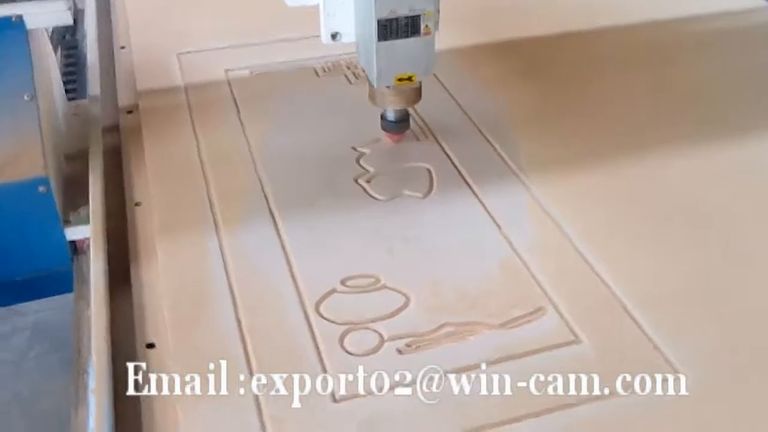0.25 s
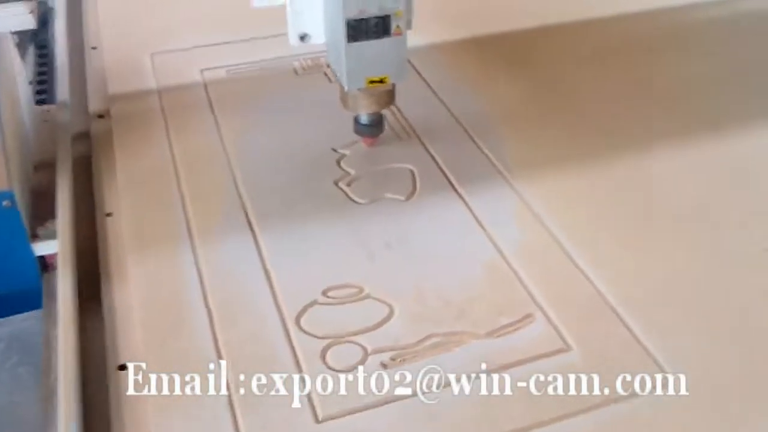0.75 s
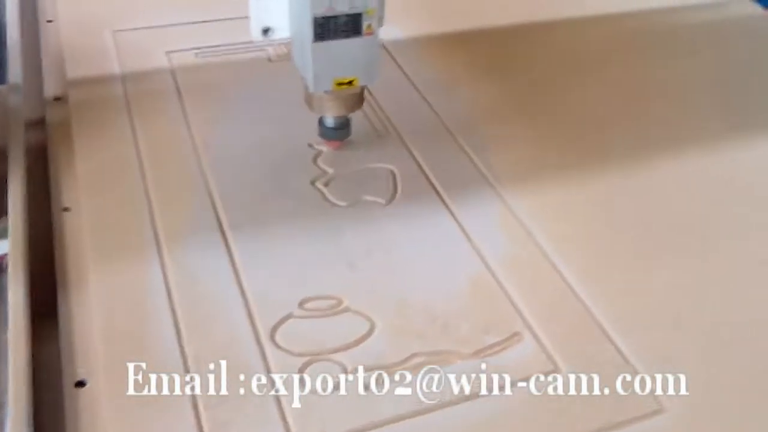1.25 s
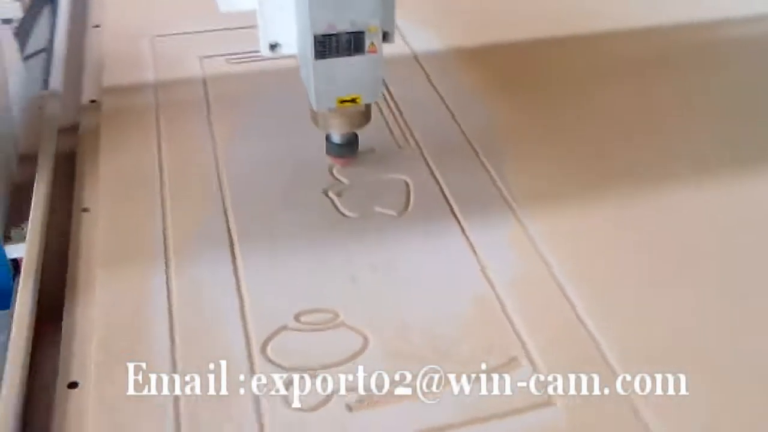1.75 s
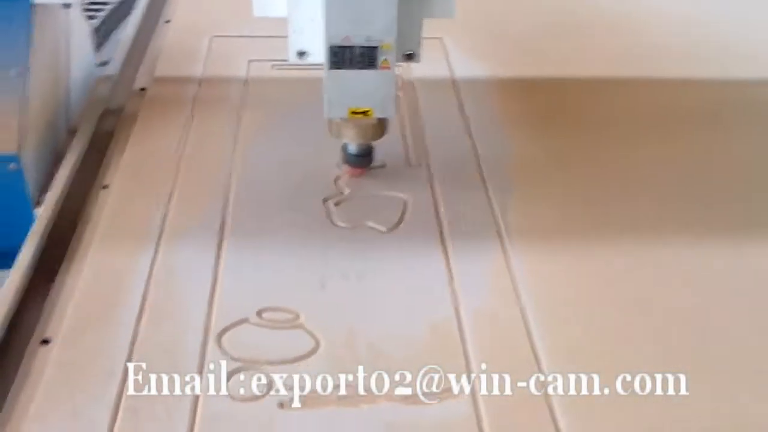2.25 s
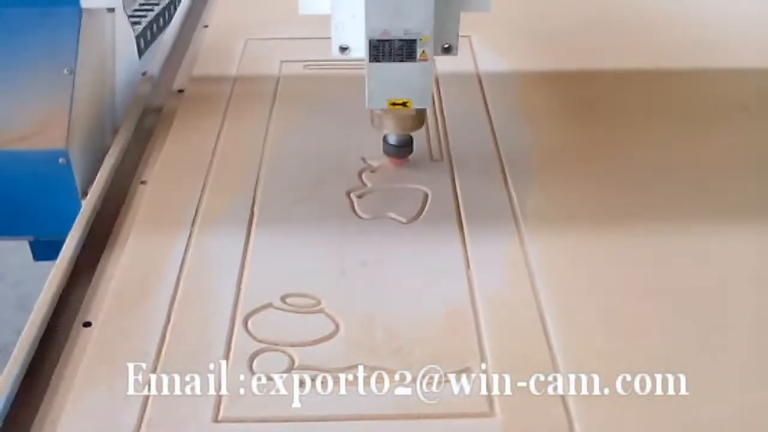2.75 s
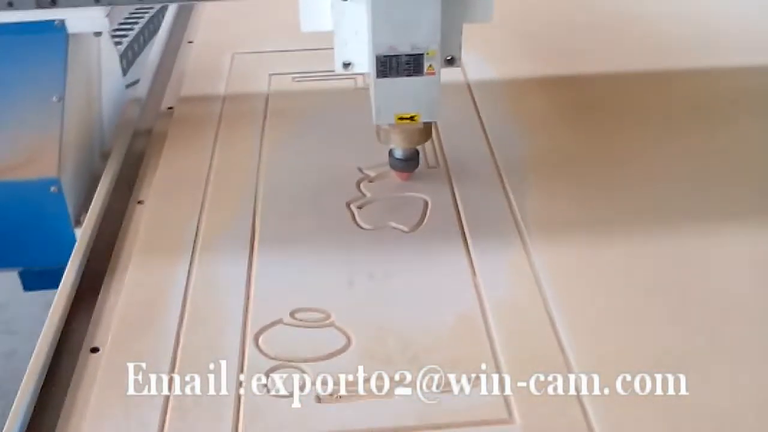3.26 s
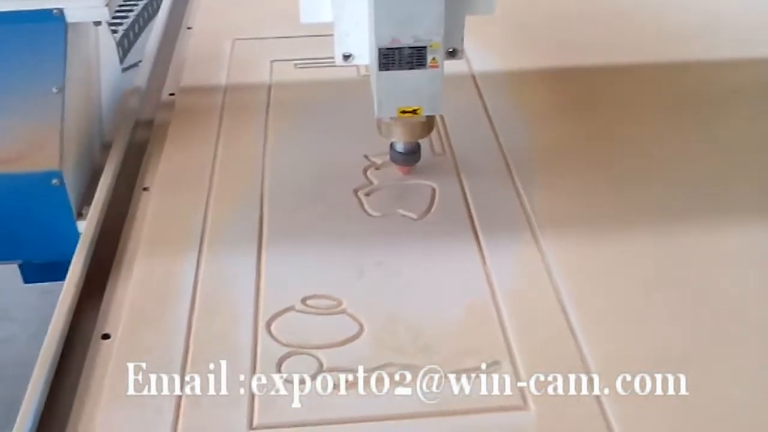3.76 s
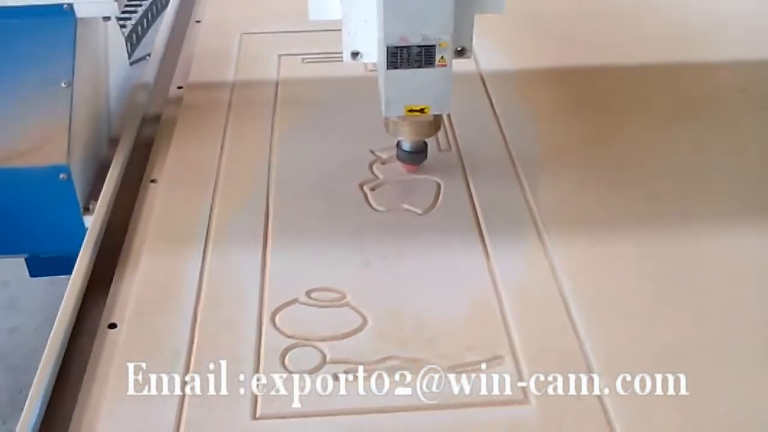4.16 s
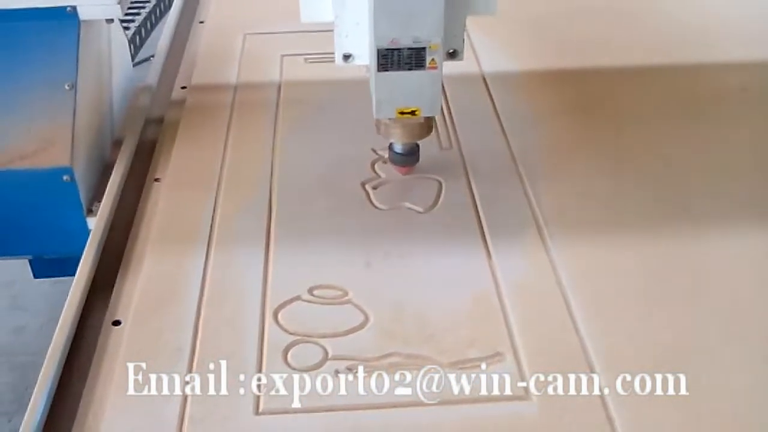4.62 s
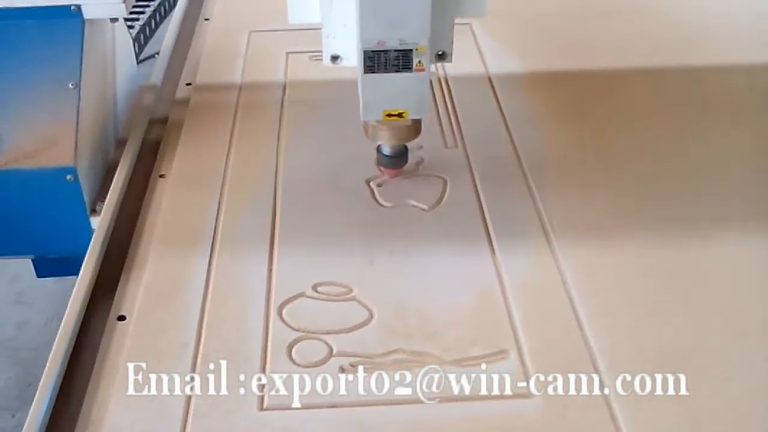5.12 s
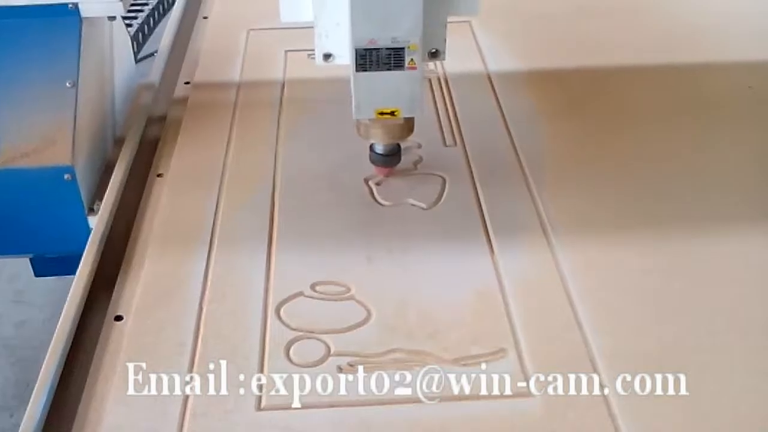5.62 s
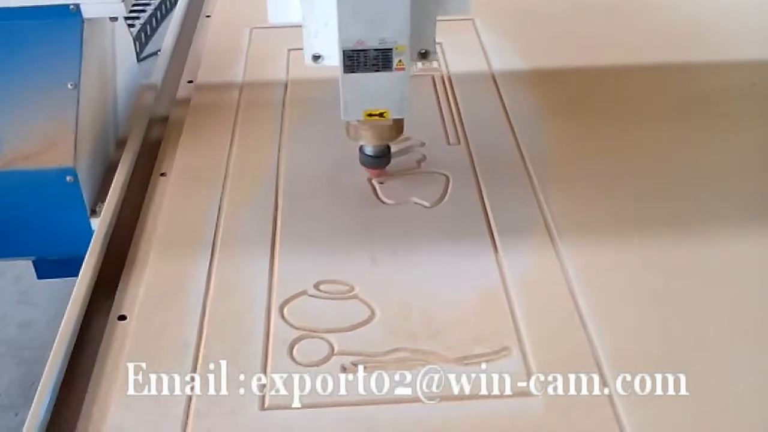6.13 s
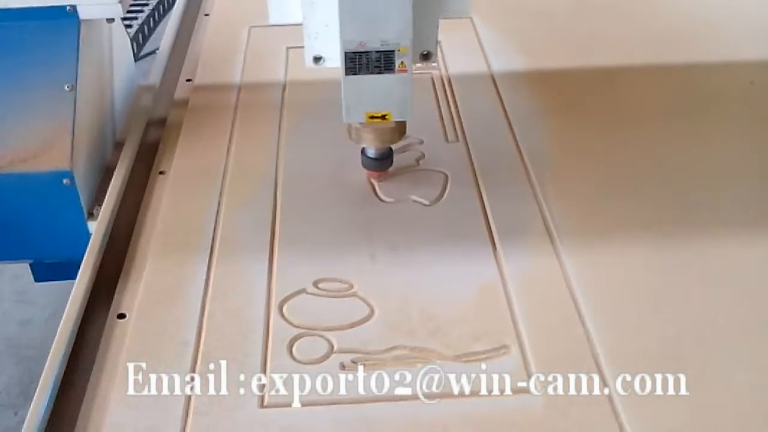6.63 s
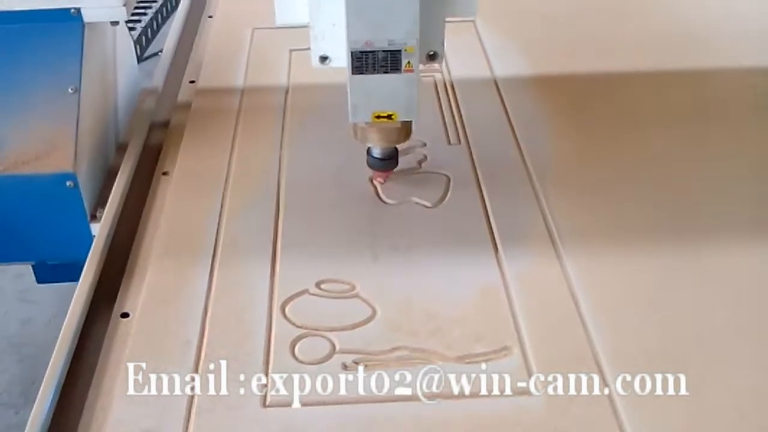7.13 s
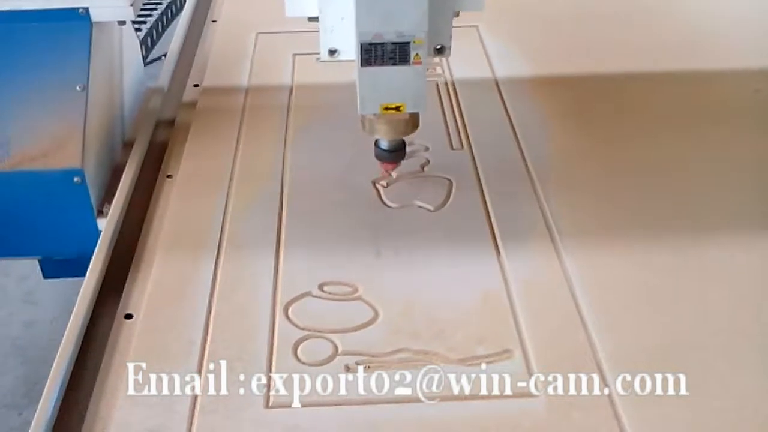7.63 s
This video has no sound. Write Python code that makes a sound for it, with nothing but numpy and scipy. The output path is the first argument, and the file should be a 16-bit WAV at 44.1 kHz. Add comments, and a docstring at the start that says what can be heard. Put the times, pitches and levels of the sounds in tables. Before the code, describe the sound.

A machine router carves grooves in a board, its loud, steady-pitched hum topped by a wavering whistle and cutting hiss.

```python
"""A loud hum with a whistle, a shifting whine and hiss: a router cuts grooves in a board near a phone.
The spindle turns near 300 times a second; its orders swell and fade with the cut and the place of
the hand-held phone. Chips hiss in a pattern that partly repeats each turn, cooling air hisses above,
the workshop rumbles below. A low drone passes near the end. The phone overloads."""
import sys
import numpy as np
from scipy import signal
from scipy.fft import rfft, irfft, next_fast_len
from scipy.io import wavfile
from scipy.ndimage import uniform_filter1d

SR = 44100
rng = np.random.default_rng(int(sys.argv[2]) if len(sys.argv) > 2 else 0)


def log_audio(samples):
    """Write samples as a 16-bit WAV file to the path given in sys.argv[1]."""
    # one column per channel
    frames = np.atleast_2d(samples).T
    # limit to full scale, then quantise
    limited = np.clip(frames, -1, 1)
    pcm = np.round(limited * 32767).astype(np.int16)
    wavfile.write(sys.argv[1], SR, pcm)


N = 347497
SHAFT_HZ = 299.53

# Board hum, rising with depth of cut. Each row: time in seconds, level in dB, throb depth 0-1.
BOARD_HUM = [(0.0, -17, 0.4), (0.06, -15, 0.21), (1.05, -8.5, 0.08), (1.82, -9.5, 0.07), (2.04, -15.5, 0),
             (3.82, -9, 0.15), (4.45, -11, 0.15), (4.5, -7.5, 0.15), (5.38, -8, 0.08), (5.64, -13, 0.04),
             (5.75, -31, 0.13), (5.86, -12, 0.05), (5.97, -10.5, 0), (6.32, -15, 0.04), (6.56, -10, 0.1),
             (6.76, -10.5, 0.05), (6.89, -19.5, 0.13), (6.96, -35, 0.13), (7.04, -17.5, 0.2),
             (7.09, -15.5, 0), (7.61, -30, 0.2), (7.7, -20, 0.13), (7.84, -17, 0.05), (7.88, -18, 0.13)]


def hum(shaft_rad):
    """The board hums at the shaft rate: a slightly rough, throbbing sine that drops out three times."""
    throb_hz, rough_hz, roughness, pan_db = 26.53, 60.5, 0.11, -2.0
    level_db, depth = columns(BOARD_HUM)
    throb = depth * np.sin(2 * np.pi * np.cumsum(throb_hz + 2.39 * walk(5)) / SR)
    envelope = undb(level_db) * (1 + throb + roughness * walk(rough_hz))
    tone = np.sqrt(2) * envelope * np.sin(shaft_rad + roughness * walk(rough_hz))
    return tone * undb(np.array([[pan_db], [-pan_db]]) / 2)


def whistle(shaft_rad):
    """Motor tone on order 12: chatters as the bit bites, leans from ear to ear as the phone moves."""
    # Each row: time in seconds, level in dB, left minus right in dB.
    course = [(0.0, -26, -3.0), (0.11, -20, 6), (0.59, -22.5, 1), (0.7, -16, 1.0), (0.81, -23.5, 0.0),
              (1.07, -18, 0.5), (1.36, -25.5, 5), (1.73, -27, 6), (1.86, -20, 0.0), (2.06, -18, 5.0),
              (2.08, -14.5, -1), (2.24, -21, 5), (2.46, -21.5, 15), (2.7, -16.5, 4), (3.45, -20, 7),
              (4.02, -22.5, 11), (4.32, -22, 8), (4.52, -25, 14), (5.4, -22, 1.0), (5.73, -17.5, 5),
              (5.86, -22, 5.0), (6.21, -19, 4), (6.34, -20.5, 8.0), (6.63, -18.5, 4), (7.15, -22.5, 19),
              (7.46, -31, 12), (7.64, -38, 9), (7.88, -17, -0.5)]
    level_db, pan_db = columns(course)
    level_db = level_db + 1.25 * walk(19)
    pan_db = pan_db + 1.3 * walk(4.8)
    ears = undb(np.array([pan_db, -pan_db]) / 2)
    lag_rad = 0.067 * walk(2.64) * np.array([[1], [-1]])
    chatter = 1 + 0.19 * walk(38)
    tone = np.sqrt(2) * np.sin(12 * shaft_rad + .2 * walk(40) + lag_rad)
    return undb(level_db) * chatter * ears / ears.mean(axis=0) * tone


def whine(shaft_rad):
    """Flutes, bearings and motor sing, mostly on whole multiples of the shaft rate."""
    # Multiples of the shaft rate that swell.
    strong_orders = [2, 3, 4, 5, 6, 7, 8, 9, 10, 18]
    # One row per strong order: level between swells in dB, side minus mid in dB.
    rest_levels = [(-38, -15), (-42.5, -4.5), (-51.5, -2.5), (-43.5, -6), (-33.5, 1.5), (-39.5, -2),
                   (-36.5, -16), (-35, 0), (-37.5, -2), (-33, -2)]
    # The bit changes direction and bite. Each row: time in seconds, order, added peak in dB,
    # half length in seconds.
    swells = [(0, 6, -25.5, 0.54), (0.13, 2, -32.0, 0.26), (0.16, 9, -29.5, 0.096), (0.17, 3, -28, 0.54),
              (0.25, 4, -31.0, 0.25), (0.3, 8, -28, 0.11), (0.35, 5, -34.0, 0.12), (0.56, 18, -26, 0.13),
              (0.62, 9, -31.5, 0.04), (1.04, 10, -27, 0.03), (1.062, 7, -25.5, 0.67),
              (1.07, 6, -30.0, 0.12), (1.2, 8, -32, 0.19), (1.22, 5, -38, 0.48), (1.26, 10, -31.5, 0.89),
              (1.31, 3, -31.5, 0.31), (1.38, 2, -30, 0.47), (1.63, 7, -24, 0.022), (1.803, 3, -31.0, 0.12),
              (1.85, 8, -31, 0.065), (1.85, 10, -25, 0.03), (2.27, 2, -21, 0.19), (2.36, 6, -26, 0.3),
              (2.49, 7, -33, 0.41), (2.64, 2, -28.5, 0.25), (2.72, 4, -33.5, 0.48), (2.86, 6, -21.5, 0.078),
              (2.96, 5, -38.5, 0.6), (2.97, 2, -30, 0.065), (3.503, 6, -22.0, 0.12), (3.7, 3, -35.5, 0.59),
              (3.81, 7, -29, 0.21), (3.867, 2, -31, 0.64), (3.88, 6, -33, 0.09), (4.17, 8, -27, 0.093),
              (4.22, 18, -34, 0.26), (4.39, 6, -31.5, 0.58), (4.39, 9, -25, 0.059), (4.4, 4, -33, 0.1),
              (5.234, 6, -30.5, 0.093), (5.52, 6, -34, 0.036), (5.76, 4, -35, 0.22), (5.82, 5, -32, 0.03),
              (5.84, 18, -40, 0.64), (5.99, 2, -27.0, 0.37), (6.13, 10, -38, 0.11), (6.19, 5, -32, 0.12),
              (6.24, 3, -32.5, 0.63), (6.26, 9, -24, 0.18), (6.363, 2, -23, 0.16), (6.37, 7, -35.5, 0.088),
              (6.47, 6, -31, 0.045), (6.68, 8, -26, 0.09), (6.678, 9, -29, 0.04), (6.86, 2, -31.5, 0.23),
              (6.9, 7, -34, 0.04), (6.91, 18, -27, 0.057), (6.93, 4, -32, 0.25), (6.93, 6, -26, 0.06),
              (6.988, 9, -30, 0.05), (7.48, 3, -28, 0.03), (7.48, 18, -31.5, 0.7)]
    # Rasping orders. Each row: order, level in dB, side minus mid in dB.
    weak_orders = [(11, -42, 0), (13, -43, -3), (14, -40, -6), (15, -42, 3), (16, -44, 6), (17, -42, 3),
                   (19, -43, 0), (22, -53, 11)]
    # Off-order tones, likely bearings and inverter. Each row: Hz, level in dB, side minus mid in dB.
    stray_tones = [(4310, -38, -4), (10600, -51, 3), (14103, -49, 4)]
    out = 0
    for order, (rest_db, side_db) in zip(strong_orders, rest_levels):
        swell = sum(undb(db) * bump(at_s, half_s) for at_s, k, db, half_s in swells if k == order)
        level_db = 20 * np.log10(undb(rest_db) + swell) + 1.14 * walk(9.5)
        roughness = min(.05 * order, .6)  # bit wobble blurs high orders more
        out += partial(order * shaft_rad, level_db, side_db, roughness)
    for order, level_db, side_db in weak_orders:
        out += partial(order * shaft_rad, level_db + 2 * walk(3.32), side_db, roughness=.75)
    for hz, level_db, side_db in stray_tones:
        out += partial(hz / SHAFT_HZ * shaft_rad, level_db + 2 * walk(2.87), side_db, roughness=.21)
    return out


def partial(phase_rad, mid_db, side_offset_db, roughness):
    """One stereo tone; the side part arrives by other paths, so its level and phase drift alone."""
    flutter_db, drift_rad, side_follow = 1.1, 0.38, 0.21
    start_rad = 2 * np.pi * rng.random(2)
    rasp = undb(flutter_db * walk(14)) * (1 + roughness * walk(90))
    mid = undb(mid_db) * np.sin(phase_rad + start_rad[0] + drift_rad * walk(6) + roughness * walk(70))
    followed_db = side_follow * mid_db + (1 - side_follow) * np.mean(mid_db)
    side_db = followed_db + side_offset_db + 3 * walk(4.04)
    side = undb(side_db) * np.sin(phase_rad + start_rad[1] + 1.07 * walk(2.53) + roughness * walk(70))
    return np.sqrt(2) * rasp * np.array([mid + side, mid - side])


def squeals(shaft_rad):
    """The bit squeals briefly on high orders, stronger on the left."""
    # Each row: time in seconds, order, peak before panning in dB, half length in seconds.
    events = [(1.85, 36, -34, .025), (1.94, 35, -33, .02), (1.94, 36, -28, 0.025), (2.03, 36, -29, 0.035),
              (2.034, 37, -25, 0.038)]
    tone = sum(undb(db) * bump(at_s, half_s) * np.sin(order * shaft_rad)
               for at_s, order, db, half_s in events)
    return tone * np.array([[1.8], [.8]])


def hiss_spectra(hz, fft_size):
    """Mid and side noise spectra; each turn meets nearly the same wood, so the noise combs."""
    # Frame, board and spindle body modes. Each row: centre in Hz, width in Hz, boost in dB.
    resonances = [(129.7, 20, 9.5), (735, 31, 5.5), (1378, 21, 10), (1562, 37, 3.5), (2343, 240, 4.5),
                  (3007, 82, 7), (3698, 120, 5.5), (4215, 460, 4.5), (5360, 570, 4), (10880, 460, 3.5)]
    # Noise colours. Each row: Hz, relative density in dB.
    mid_colour = [(30, -34), (65, -32), (95, -17.5), (230, -15), (290, -14.5), (390, -25.5), (560, -18.5),
                  (1620, -23), (2000, -17), (2800, -16), (4000, -14), (5600, -16.5), (6800, -23.5),
                  (7600, -88), (9000, -30.5), (10000, -25), (14000, -23), (15300, -32.5)]
    side_colour = [(30, -34), (235, -30), (297, -18), (390, -42), (889, -26), (1300, -22.5), (2000, -20),
                   (2730, -18.5), (4000, -11.5), (4970, -6), (6300, -15), (7150, -17), (14100, -16),
                   (15300, -30)]
    # Lean to one ear. Each row: Hz, left minus right in dB.
    lean = [(60, -4), (110, 0.5), (200, 1), (380, -7.5), (690, 2), (1280, 0), (2360, 1.5), (4350, -4.5),
            (8020, 3.5), (14800, 8)]
    # Mid noise a quarter cycle ahead in the side, as between two ports. Each row: Hz, share -1 to 1.
    quadrature = [(170, .06), (430, .2), (900, .6), (1450, .4), (1800, -.02), (2300, -.22), (3400, -0.39),
                  (4400, .1), (5200, -.28), (6100, -0.15), (12000, 0.11)]
    repeat_share, mid_db, side_db = 0.16, -16.5, -17.5
    comb = 1 / (1 - repeat_share * np.exp(-2j * np.pi * hz / SHAFT_HZ))
    body = undb(sum(db / (1 + (2 * (hz - f) / width) ** 2) for f, width, db in resonances))
    mid, side = undb(over_hz(mid_colour, hz)), undb(over_hz(side_colour, hz))
    mid *= undb(mid_db) / np.sqrt(np.mean(mid ** 2))
    side *= undb(side_db) / np.sqrt(np.mean(side ** 2))
    # A lean means that mid and side share part of their noise.
    power_ratio = undb(2 * over_hz(lean, hz))
    balance = (power_ratio - 1) / (power_ratio + 1)
    shared = np.clip(balance * (mid ** 2 + side ** 2) / (2 * mid * side), -.95, .95)
    ahead = over_hz(quadrature, hz)
    unshared = np.sqrt(np.clip(1 - shared ** 2 - ahead ** 2, 0, 1))
    common, separate = (comb * body * rfft(rng.standard_normal(fft_size)) for _ in range(2))
    return np.array([mid * common, side * ((shared + 1j * ahead) * common + unshared * separate)])


def hiss(shaft_rad):
    """Chips, cooling air and workshop rumble in flickering half-octave bands, pulsing once a turn."""
    # Most bands sink under a loud hum. Each row: Hz, dB lost per dB of hum.
    ducking = [(70, .45), (150, 0.64), (300, -0.35), (430, 0.2), (600, 0.4), (1050, 0.56), (2200, 0.14),
               (4500, 0.41), (12000, 0.07)]
    # Low and high shelf gains. Each row: time in seconds, gain in dB.
    rumble = [(0, -2), (.3, 2.5), (.7, 2), (1.15, 5), (1.5, -13), (1.9, 2), (2.3, 2.5), (2.9, 4), (3.5, -4),
              (4.1, .5), (4.6, 4), (5.2, -6), (5.75, 0), (6.3, -3), (6.9, 4), (7.3, -3), (7.88, -4.5)]
    treble = [(0, 0), (.9, -0.1), (1.2, -0.2), (2.0, 0.2), (3.0, 1), (3.9, -0.2), (4.4, 0.7), (5.2, -3.1),
              (5.6, 0.4), (6.1, -1.5), (6.8, -0.2), (7.88, -0.3)]
    rumble_top_hz, treble_from_hz = 190, 3300
    duck_from_db, flicker_db, pulse_depth = -14.5, .8, 0.025
    fft_size = next_fast_len(N)
    hz = np.arange(fft_size // 2 + 1) * SR / fft_size
    spectra = hiss_spectra(hz, fft_size)
    hum_db = np.maximum(columns(BOARD_HUM)[0], duck_from_db)
    hum_db -= hum_db.mean()
    rumble_db = columns(rumble)[0] + 2 * walk(5.8)
    treble_db, = columns(treble)
    bands, octave = 0, np.log2(hz + 1)
    for centre in np.arange(5, 14.6, .5):
        centre_hz = 2 ** centre
        window = np.cos(np.pi * np.clip(octave - centre, -.5, .5)) ** 2
        gain_db = rumble_db / (1 + (centre_hz / rumble_top_hz) ** 2)
        gain_db -= over_hz(ducking, centre_hz) * hum_db
        gain_db += treble_db / (1 + (treble_from_hz / centre_hz) ** 2)
        gain_db = gain_db + flicker_db * np.array([walk(9), walk(36)])
        bands += undb(gain_db) * irfft(spectra * window, fft_size)[:, :N]
    mid, side = bands * (1 + pulse_depth * np.sin(shaft_rad))
    return np.array([mid + side, mid - side])


def drone():
    """A soft low tone comes and goes, perhaps an axis drive."""
    # Each row: time in seconds, pitch in Hz, level in dB, half length in seconds.
    events = [(7.36, 83.7, -36, 0.29)]
    t = np.arange(N) / SR
    return sum(np.sqrt(2) * undb(db) * bump(at_s, half_s) * np.sin(2 * np.pi * hz * t + .6 * walk(6.5))
               for at_s, hz, db, half_s in events)


def undb(db):
    """Gain of a level in dB."""
    return 10 ** (np.asarray(db) / 20)


def columns(table):
    """Value columns of a time table, interpolated per sample."""
    times_s, *values = np.transpose(table)
    return [np.interp(np.arange(N) / SR, times_s, column) for column in values]


def over_hz(table, hz):
    """Value of a (Hz, value) table on a log-frequency axis."""
    knots_hz, values = np.transpose(table)
    return np.interp(np.log(hz + 1), np.log(knots_hz), values)


def walk(rate_hz):
    """Random levels joined smoothly; spread near 1."""
    hop = 16
    hold = int(SR / hop / rate_hz)
    steps = np.repeat(rng.standard_normal(N // hop // hold + 2), hold)
    smooth = uniform_filter1d(uniform_filter1d(steps, hold), hold)
    return np.repeat(1.3 * smooth, hop)[:N]


def bump(at_s, half_s):
    """Gaussian swell: 1 at at_s, 1/e at half_s to either side."""
    return np.exp(-((np.arange(N) / SR - at_s) / half_s) ** 2)


def scene():
    """Hum, whistle, whine, squeals and hiss on one shaft angle, plus the drone."""
    shaft_rad = 2 * np.pi * SHAFT_HZ * np.arange(N) / SR
    tones = hum(shaft_rad) + whistle(shaft_rad) + whine(shaft_rad) + squeals(shaft_rad)
    return tones + hiss(shaft_rad) + drone()


def record(dry):
    """The phone clips the peaks and cuts the top."""
    drive_db, top_hz, stop_db = 0.5, 15470, 31
    lowpass = signal.ellip(10, .1, stop_db, top_hz, fs=SR, output="sos")
    return signal.sosfilt(lowpass, np.clip(undb(drive_db) * dry, -1, 1))


dry = scene()
out = record(dry)
log_audio(out)
```